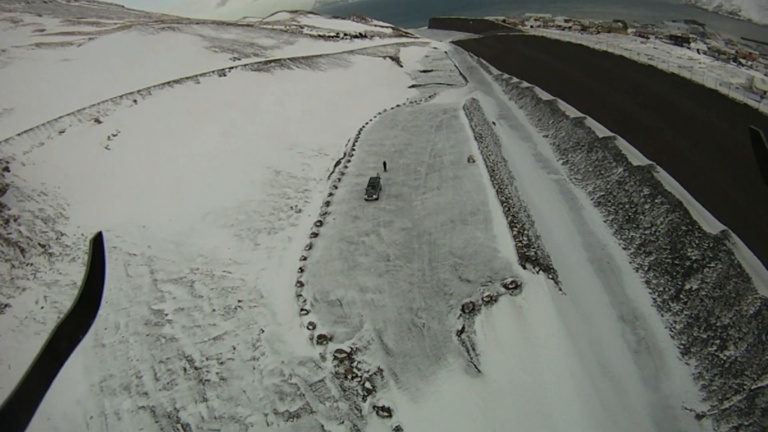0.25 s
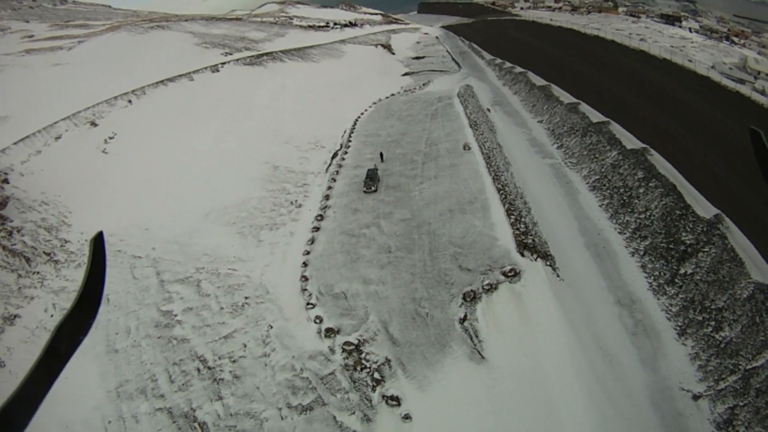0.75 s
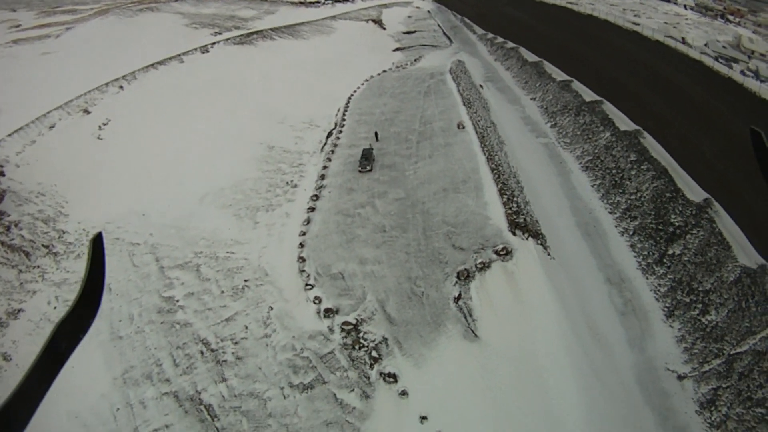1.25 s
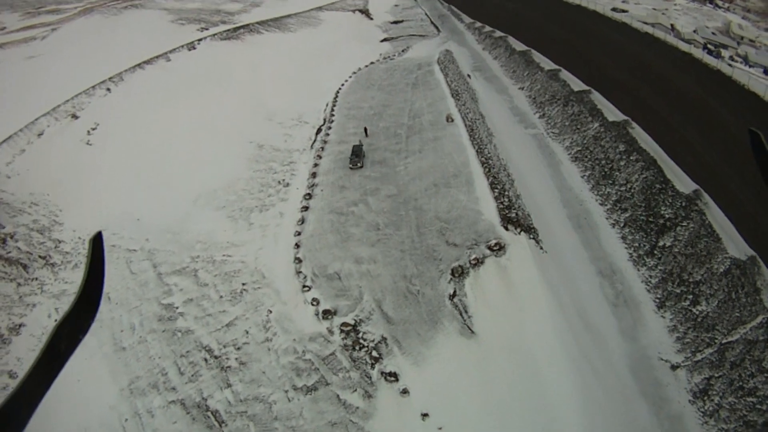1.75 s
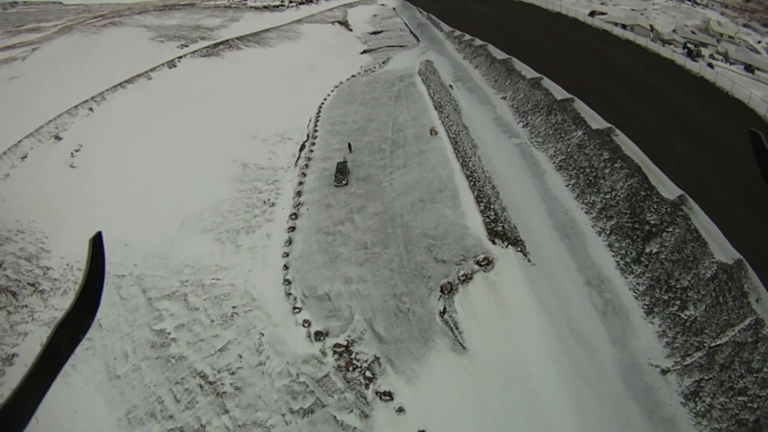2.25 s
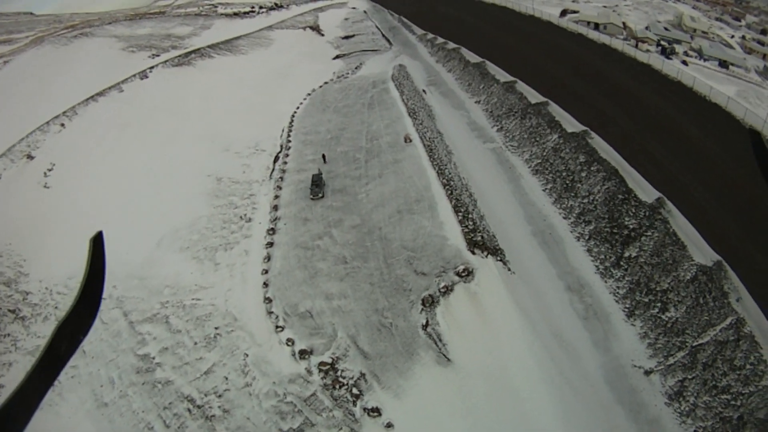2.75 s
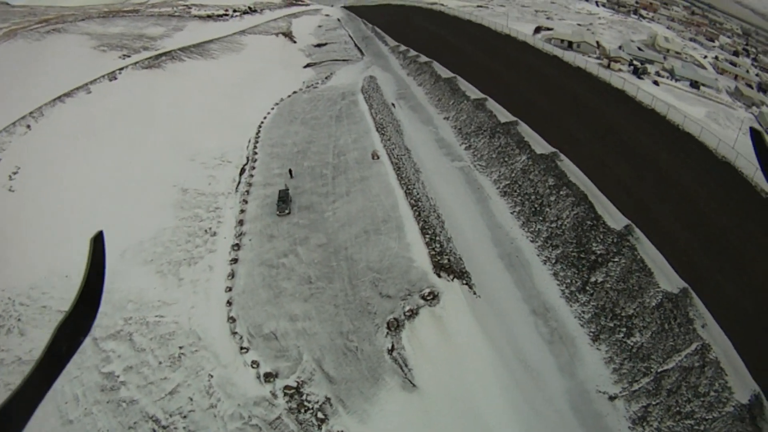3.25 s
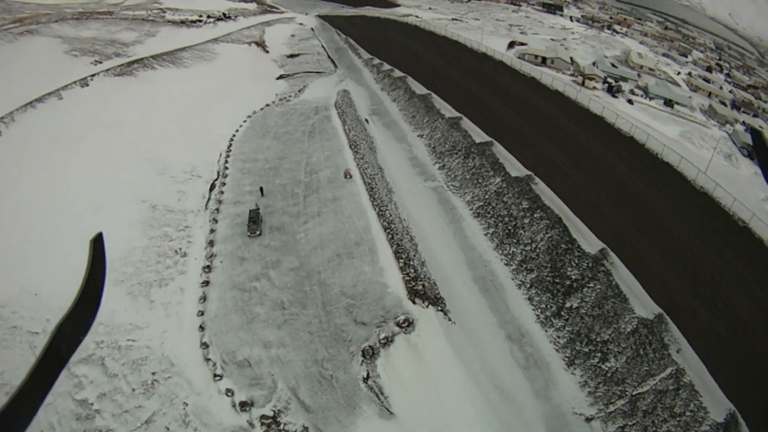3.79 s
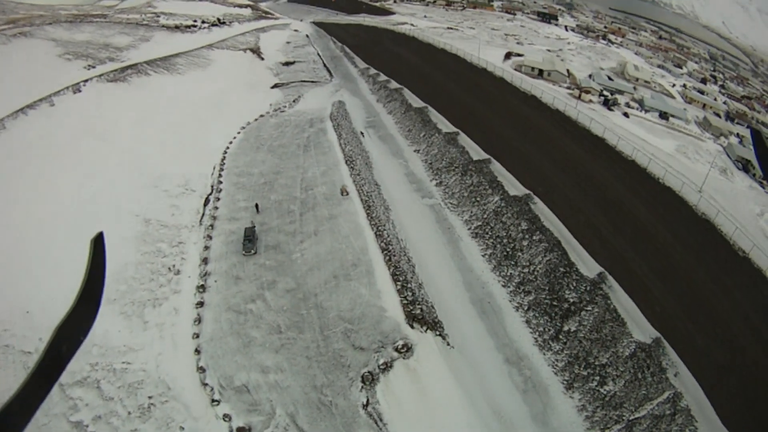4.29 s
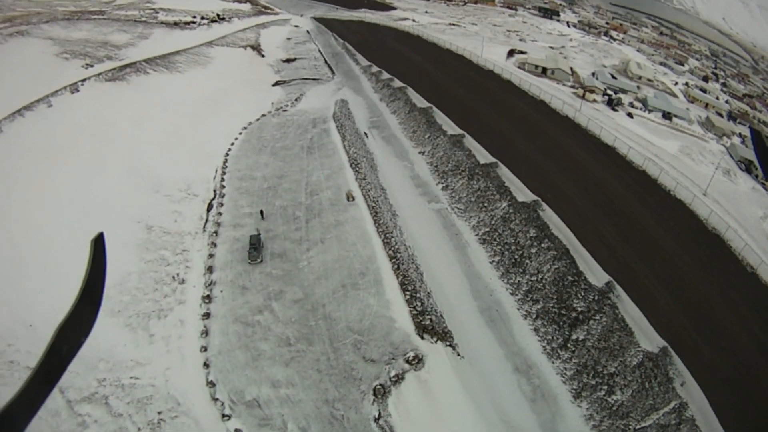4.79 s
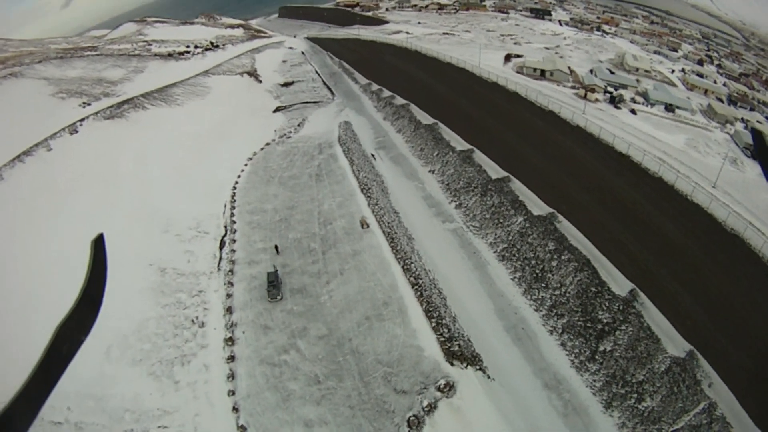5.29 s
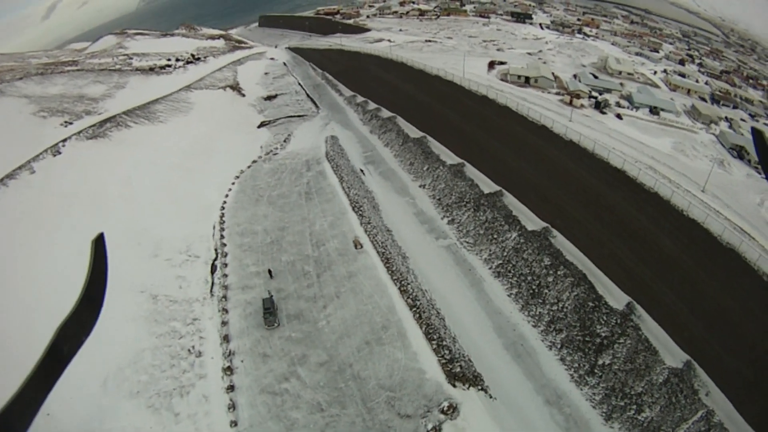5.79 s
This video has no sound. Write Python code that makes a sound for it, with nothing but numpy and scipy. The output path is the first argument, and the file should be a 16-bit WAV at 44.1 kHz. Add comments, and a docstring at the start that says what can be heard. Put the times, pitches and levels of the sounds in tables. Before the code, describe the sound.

Close, rough drone-propeller hum flutters through rapid wind gusts, with low rumble, rasping ticks, hard snaps and faint high motor whine.

```python
"""Eight-rotor drone in gusty wind

Heard from the camera slung under its frame. Propellers at slightly different speeds give a throbbing hum and buzz;
the motor drives whine faintly, blade tips hiss and wind rumbles over the microphone.
Gusts swell the hum, drag its pitch down and bring a rasping crackle of ticks and hard single snaps on the falling
swings of the hum, as of an overloaded microphone. Now and then the propellers cancel: the hum drops into a lull."""
import sys
import numpy as np
from scipy import signal
from scipy.fft import rfft, irfft
from scipy.io import wavfile
from scipy.ndimage import uniform_filter1d, minimum_filter1d

SR = 44100
rng = np.random.default_rng(int(sys.argv[2]) if len(sys.argv) > 2 else 0)


def wav_record(signal):
    """Record a signal, one row per channel, as 16-bit PCM in the file named by sys.argv[1]."""
    frames = np.transpose(np.atleast_2d(signal))
    bounded = np.clip(frames, -1, 1)
    # unit amplitude maps onto the largest positive 16-bit level
    quanta = np.round(bounded * 32767).astype(np.int16)
    wavfile.write(sys.argv[1], SR, quanta)


N = 266099
TIME = np.arange(N) / SR
FREQS = np.maximum(np.arange(N // 2 + 1) * SR / N, 1)


def undb(db):
    """Decibels to gain."""
    return 10 ** (np.asarray(db) / 20)


def level(x, rms_db):
    """Scale to an rms level, treating the mean as zero."""
    return x * undb(rms_db) / np.std(x)


def walk(rate_hz):
    """Smooth random drift with unit spread: random steps averaged twice."""
    hold = int(SR / rate_hz)
    steps = np.repeat(rng.standard_normal(N // hold + 1), hold)
    smooth = uniform_filter1d(uniform_filter1d(steps, hold), hold)
    return level(smooth[:N], 0)


def curve(points):
    """Straight lines over time through (t/s, value) points."""
    return np.interp(TIME, *np.transpose(points))


def colour(x, points):
    """Filter by a spectrum of (f/Hz, gain/dB) points, linear in dB over log f."""
    hz, db = np.transpose(points)
    gain = undb(np.interp(np.log(FREQS), np.log(hz), db))
    return irfft(rfft(x) * gain, N)


# blade-pass rate shared in still air: t/s, f/Hz
BLADE_RATE = [(0.0, 174.3), (0.85, 172.2), (1.04, 166.1), (1.15, 175), (1.35, 164.8), (1.65, 186.2),
              (1.85, 175.8), (2.05, 168.5), (2.3, 174.2), (3.2, 171.1), (3.78, 176.7), (4.05, 167.9),
              (4.4, 172.7), (4.7, 173.2), (5.15, 169.1), (5.31, 186.1), (5.45, 169.1), (5.7, 175.3),
              (6.03, 169.7)]
GUST_SAG_HZ = 9  # per unit gust


def blade_rate(gust, wander_hz=2.5):
    """Pitch of the joint blade tone: gusts drag it down; in calm air it wanders between the propellers."""
    sag_hz = GUST_SAG_HZ * gust
    return curve(BLADE_RATE) - sag_hz + wander_hz * (1 - gust) * walk(18)


# overtones of the joint blade tone, half orders from unbalanced blades: multiple, level/dB
OVERTONES = [(1.5, -15), (2, -15), (2.5, -14), (3, -16.5), (3.5, -26), (4, -29), (5, -29)]


def hum(phase, overtone_db, smear_rad=1.2, flicker_db=1.0):
    """Joint blade tone; overtones of several propellers never hold one phase."""
    overtones = 0
    for multiple, db in OVERTONES:
        overtones = overtones + undb(db) * np.sin(multiple * phase + smear_rad * walk(22))
    flicker = undb(flicker_db * walk(40))
    return np.sqrt(2) * flicker * (np.sin(phase) + undb(overtone_db) * overtones)


# resonances of the frame: f/Hz, width/Hz, lift/dB
FRAME_MODES = [(892, 150, 8), (1439.7, 330, 12), (2371, 380, 15)]


def airframe(x):
    """The frame lifts whatever passes near its resonances."""
    lift_db = 0
    for hz, width_hz, db in FRAME_MODES:
        lift_db = lift_db + db / (1 + (2 * (FREQS - hz) / width_hz) ** 2)
    return irfft(rfft(x) * undb(lift_db), N)


# nominal cruise of each propeller: shaft f/Hz, level/dB
ROTORS = [(76, -4.5), (80, -3.5), (84, -4.5), (88, -3.5), (91, -3), (93.5, -2), (96, -4.5), (99.5, -4)]
# spectrum of the propeller buzz: f/Hz, gain/dB
BUZZ_SPECTRUM = [(70, -1.5), (95, 0.7), (130, -3), (185, 5), (235, -6), (290, -9), (340, -1), (500, -3.5),
                 (600, -16.5), (760, -12.5), (960, -20.5), (1120, -32), (2000, -49), (2500, -53.5),
                 (2800, -68), (6000, -76)]


def propellers(pace, trim=.018, flutter=0.007, follow=.6, shadow_db=3, order=64):
    """Each repeats its own pressure pattern every turn; the controller trims speed, eddies vary strength."""
    turn = np.linspace(0, 1, 2049)
    multiples = np.arange(1, order + 1)[:, None]
    out = 0
    for shaft_hz, db in ROTORS:
        starts = rng.random((order, 1))
        pattern = np.sin(2 * np.pi * (multiples * turn + starts)).sum(axis=0)
        speed_hz = shaft_hz * pace ** follow * (1 + trim * walk(4) + flutter * walk(22))
        position = np.cumsum(speed_hz) / SR % 1
        out = out + undb(db + shadow_db * walk(14)) * np.interp(position, turn, pattern)
    return level(airframe(colour(out, BUZZ_SPECTRUM)), 0)


# gain of the arm resonance: t/s, level/dB
ARM_RING = [(0, 6.5), (.21, -7.5), (.3, 5.5), (.47, 3.5), (.58, -8), (.68, 11.5), (.9, -4), (1.0, 5),
            (1.19, -1.5), (1.52, 6.5), (1.8, 3), (2.1, 2.5), (2.27, -1.5), (2.55, 3.5), (2.64, -2),
            (2.9, 1), (3.35, -5), (3.83, 3), (3.92, -1.5), (4.54, 2.5), (4.63, -8), (4.74, 4), (5.2, -1),
            (5.38, 3.5), (5.47, -2), (5.8, 2.5), (6.03, -1.5)]
ARM_RATE_HZ, ARM_SPREAD_DB, ARM_GUST_DB = 16, 1, -1.5  # last: per unit gust above the mean


def arms(buzz, gust, drift_hz=10):
    """The lowest frame resonance changes level and drifts as propeller overtones pass through it."""
    hz, width_hz, _ = FRAME_MODES[0]
    ring = irfft(rfft(buzz) * np.exp(-((FREQS - hz) / width_hz) ** 2), N)
    turning = np.exp(2j * np.pi * np.cumsum(drift_hz * walk(7)) / SR)
    drifting = np.real(signal.hilbert(ring) * turning)
    ring_db = curve(ARM_RING) + ARM_SPREAD_DB * walk(ARM_RATE_HZ) + ARM_GUST_DB * (gust - gust.mean())
    return buzz - ring + drifting * undb(ring_db)


# wind on the microphone: f/Hz, gain/dB
BUFFET = [(20, -1.5), (45, -8), (68, -0.5), (110, 1), (250, 1), (450, -2.5), (700, -13.5), (1100, -25.5),
          (2000, -46), (5000, -67.5)]


def wind(flicker_db=2):
    """Eddies rumble over the microphone port: coloured noise of unsteady level."""
    rumble = level(colour(rng.standard_normal(N), BUFFET), 0)
    return rumble * undb(flicker_db * np.tanh(walk(35)))


# air hissing off the blade tips: f/Hz, gain/dB
HISS_SPECTRUM = [(500, -10), (2500, -7), (4300, 1.5), (5800, -26.5), (7200, -2), (7550, -8), (8400, -8.5),
                 (9800, -19), (15000, -18.5)]
HISS_DB, PORT_HISS_DB = -68.5, -80.5


def tip_hiss(flutter_db):
    """Blade-tip air noise, shared by both channels and fluttering fast."""
    flutter = undb(flutter_db * walk(180))
    return level(colour(rng.standard_normal(N), HISS_SPECTRUM) * flutter, HISS_DB)


def port_hiss():
    """Weaker steady hiss of the same colour, independent per channel."""
    return level(colour(rng.standard_normal((2, N)), HISS_SPECTRUM), PORT_HISS_DB)


# switching tones of the motor drives: f/Hz, level/dB
WHINE = [(8012, -86), (8032, -88.5), (8045, -78.5), (8066, -81), (8925, -87), (8950, -91)]


def drives(waver_hz=3, flicker_db=2):
    """Thin, almost steady sines from the motor drives."""
    out = 0
    for hz, db in WHINE:
        tone = np.sin(2 * np.pi * np.cumsum(hz + waver_hz * walk(6)) / SR)
        out = out + np.sqrt(2) * undb(db + flicker_db * walk(7.6)) * tone
    return out


# propellers out of step, cancelling: t/s, length/s, depth/dB
LULLS = [(0.129, 0.032, -1.5), (0.273, 0.049, -8.5), (0.559, 0.049, -13), (0.747, 0.036, -9),
         (0.896, 0.049, -8), (1.094, 0.024, -7), (1.204, 0.032, -9.5), (1.485, 0.021, -8),
         (1.608, 0.059, -9), (1.797, 0.053, -11.5), (1.899, 0.024, -7), (2.141, 0.039, -5),
         (2.219, 0.027, -11), (2.297, 0.019, -6), (2.717, 0.028, -12), (3.033, 0.063, -13),
         (3.258, 0.02, -4.5), (3.335, 0.055, -8), (3.568, 0.052, -10), (3.882, 0.026, -9),
         (3.95, 0.033, -6.5), (4.248, 0.022, -11.5), (4.521, 0.024, -9.5), (4.594, 0.021, -9.5),
         (4.946, 0.019, -6.5), (5.018, 0.03, -6), (5.137, 0.022, -13.5), (5.268, 0.04, -2),
         (5.332, 0.029, -8.5), (5.844, 0.034, -7.5), (5.992, 0.019, -12)]


def lulls():
    """Dip in dB over time while the propellers cancel."""
    return sum(db * np.exp(-(2 * (TIME - at) / length) ** 2) for at, length, db in LULLS)


# gusts: t/s, length/s, relative hum level/dB, crackle level re hardest/dB
GUSTS = [(0.182, 0.064, -18, -10), (0.369, 0.035, -22.5, -6.5), (0.447, 0.09, -14, -4.5),
         (0.628, 0.06, -17, -4.5), (0.796, 0.068, -15, -4.5), (1.038, 0.098, -18, -2.5),
         (1.305, 0.125, -16.5, -1.5), (1.405, 0.086, -18, -10), (1.528, 0.079, -24, -4.0),
         (1.656, 0.05, -28, -11), (1.858, 0.049, -20.5, -11.5), (1.933, 0.04, -14, -7),
         (2.068, 0.124, -12.5, -1.0), (2.257, 0.058, -20, -17.5), (2.456, 0.08, -15, -3),
         (2.583, 0.22, -24, -11.5), (2.786, 0.105, -13.5, -1), (2.898, 0.055, -13, -5.5),
         (2.985, 0.035, -14, -4.5), (3.13, 0.1, -16.5, -6.5), (3.212, 0.085, -14.5, -2.5),
         (3.287, 0.037, -17, -8), (3.398, 0.082, -16.5, -3.5), (3.468, 0.035, -16, -5),
         (3.527, 0.047, -12, -5), (3.623, 0.071, -14, -3), (3.731, 0.105, -16.5, -11.5),
         (3.824, 0.061, -11, -1), (3.91, 0.04, -14.5, -5), (4.004, 0.083, -13, -5),
         (4.078, 0.057, -17, -1.5), (4.16, 0.09, -15, -2.5), (4.221, 0.03, -15.5, -14),
         (4.3, 0.03, -20.5, -7.5), (4.351, 0.062, -14, 0), (4.41, 0.04, -16, -9.5),
         (4.478, 0.066, -13.5, -1.5), (4.557, 0.06, -16, -2.5), (4.718, 0.073, -20, -11),
         (4.875, 0.175, -15.5, -3), (4.978, 0.045, -19.5, -6.5), (5.076, 0.099, -24, -11.5),
         (5.212, 0.11, -19.5, -4.0), (5.413, 0.073, -17.5, -4), (5.305, 0.05, -19.5, -11.5),
         (5.505, 0.025, -20, -8.5), (5.574, 0.08, -13.5, -1), (5.681, 0.089, -16.5, -7.5),
         (5.775, 0.105, -14.0, -2), (5.876, 0.051, -9.5, -2), (5.942, 0.052, -15.5, -5.5)]
GUST_SHAPE = 3.0  # 2 is a bell; more gives a flatter top and steeper sides


def swells(peaks_db):
    """Power over time when every gust swells to its own peak and dies away."""
    power = np.zeros(N)
    for (at, length, *_), db in zip(GUSTS, peaks_db):
        near = slice(max(int((at - 2 * length) * SR), 0), int((at + 2 * length) * SR))
        offset = np.abs(2 * (TIME[near] - at) / length)
        power[near] += undb(2 * db) * np.exp(-2 * offset ** GUST_SHAPE)
    return power


# hard single snaps: t/s, low thud level/dB, bright snap level/dB
SNAPS = [(0.356, -19, -35), (0.3661, -31.5, -37.5), (0.4172, -16, -31.5), (0.4885, -23, -35),
         (0.62, -19.5, -34), (0.6317, -20.5, -31), (0.6642, -26.5, -44.5), (0.793, -20.5, -32.5),
         (0.897, -28, -50.5), (0.919, -26.5, -40.5), (1.0133, -22, -29.5), (1.1845, -25, -40),
         (1.24, -18.5, -48), (1.2668, -18, -32), (1.279, -28, -34), (1.3044, -14, -28),
         (1.3172, -17.5, -33), (1.3355, -16.5, -30), (1.4228, -36, -37), (1.514, -20.5, -33),
         (1.572, -20.5, -40), (1.581, -28, -41), (1.6366, -39, -53), (1.6782, -22.5, -36),
         (1.7781, -23.5, -38.5), (1.8429, -18.5, -35), (1.8555, -23.5, -40), (1.8845, -26.5, -40.5),
         (1.9273, -23, -37), (1.9658, -22.5, -40), (2.0709, -20.5, -29), (2.0825, -20.5, -31.5),
         (2.1014, -18.5, -31), (2.1144, -15.5, -35), (2.2516, -33, -38), (2.3181, -22.5, -39),
         (2.3351, -23, -36), (2.4683, -17, -27), (2.5592, -25.5, -37), (2.5995, -21.5, -37),
         (2.6815, -20.5, -41), (2.694, -23.5, -37.5), (2.746, -18.5, -33), (2.7796, -19, -37),
         (2.7977, -19.5, -30.5), (2.8097, -16.5, -33), (2.8492, -26, -42), (2.8838, -38, -41),
         (2.8951, -21, -35.5), (2.9792, -19.5, -33), (3.1625, -20.5, -39), (3.2057, -17.5, -30),
         (3.2167, -18.5, -33), (3.229, -26, -33), (3.2834, -22.5, -35.5), (3.3676, -21, -40),
         (3.386, -19.5, -32), (3.4207, -21, -35), (3.5225, -17.5, -33), (3.5344, -21, -31),
         (3.6013, -22, -35.5), (3.6119, -17.5, -33), (3.7079, -23.5, -33.5), (3.7523, -21, -38),
         (3.8212, -16, -31), (3.912, -20.5, -36), (3.9826, -20, -36), (4.0185, -22, -34.5),
         (4.0736, -18, -30), (4.0848, -21, -33), (4.171, -19.5, -32.5), (4.293, -19, -36.5),
         (4.2999, -15.5, -42), (4.332, -24, -39), (4.3435, -16.5, -29), (4.3553, -15, -29),
         (4.3675, -25.5, -35), (4.4102, -20.5, -35), (4.4947, -24.5, -37), (4.5471, -20.5, -31.5),
         (4.5589, -14, -32), (4.6456, -25.5, -40), (4.7045, -22.5, -39), (4.735, -25.5, -39),
         (4.8691, -14, -37.5), (4.91, -20, -34), (4.9713, -22.5, -33.5), (4.9924, -23.5, -36.5),
         (5.0636, -24.5, -41), (5.185, -19, -34), (5.211, -19, -37), (5.2357, -16, -38),
         (5.247, -18.5, -35), (5.2994, -24.5, -39), (5.3597, -28.5, -43), (5.4023, -21, -31),
         (5.4868, -22.5, -54), (5.5071, -31.5, -34), (5.5556, -14, -32), (5.5676, -21, -29),
         (5.5798, -17, -31), (5.5978, -21.5, -32), (5.6545, -20.5, -47.5), (5.7454, -18, -33),
         (5.7755, -16.5, -34), (5.793, -15, -31), (5.823, -24, -35), (5.885, -16.5, -28),
         (5.899, -20.5, -32), (5.9404, -19.5, -37)]
THUD_GAIN_DB, SNAP_GAIN_DB = 11.5, 53  # from the listed level to the impulse that makes it
TICK_TURN = 0.31  # where in the hum cycle ticks fall: just past the crest


def impulses(levels_db):
    """One impulse at the moment of each hard snap."""
    out = np.zeros(N)
    out[(np.array(SNAPS)[:, 0] * SR).astype(int)] = undb(levels_db)
    return out


def in_step(phase, reach_s=0.02):
    """Bend the hum phase so that hard snaps fall about just after a crest; near snaps share the bend."""
    at = np.array(SNAPS)[:, 0]
    lead = np.exp(1j * (2 * np.pi * TICK_TURN - np.interp(at, TIME, phase)))
    shared = np.exp(-np.abs(at[:, None] - at) / reach_s) @ lead
    return phase + np.interp(TIME, at, np.unwrap(np.angle(shared)))


ALTERNATE_DB = 6  # ticks on successive swings alternate by plus and minus this


def ticks(pressure, phase, gust, scatter_db=8, stray_db=-7, slip_s=0.0005, rest_s=0.012):
    """Tick impulses, one per falling hum swing and some at stray crests; none around a hard snap."""
    size, slip = rng.standard_normal((N // 70 + 1, 2)).T
    swings = np.flatnonzero(np.diff(np.floor(phase / (2 * np.pi) - TICK_TURN)) > 0)
    crests, _ = signal.find_peaks(pressure, height=0, distance=SR // 600)
    strength = np.zeros(N)
    local_rms = np.sqrt(uniform_filter1d(pressure ** 2, size=2000)[crests])
    strength[crests] = undb(stray_db) * pressure[crests] / local_rms
    slips = (SR * slip_s * slip[:len(swings)]).astype(int)
    on_swing = np.clip(swings + slips, 0, N - 1)
    strength[on_swing] = undb(ALTERNATE_DB * (-1.) ** np.arange(len(on_swing)))
    at = np.flatnonzero(strength)
    strength[at] *= undb(scatter_db * np.tanh(0.4 * size[:len(at)]))
    # the gust sets how much energy the ticks of one moment share
    energy = np.abs(uniform_filter1d(strength ** 2, size=2200))
    strength = strength * gust / np.sqrt(energy + 1e-9)
    no_snap = 1. * (impulses(np.array(SNAPS)[:, 1]) == 0)
    return strength * minimum_filter1d(no_snap, int(rest_s * SR))


# brightness of a tick: f/Hz, gain/dB
TICK_SPECTRUM = [(60, -8.5), (250, -1), (1100, 3), (2500, -0.5), (4800, 0), (6500, -2.5), (10000, -2.5),
                 (15000, -9)]


def crackle(strength, ring_hz=480, damping=0.83, lag_samples=0.89, echo_db=-10, echo_s=0.0019,
            grit_db=-8.5, grit_s=0.0024, grit_width=1.3):
    """Each tick is a sharp kink and one damped swing, then a weaker repeat, with gritty noise around."""
    at = np.flatnonzero(strength)
    lag, gap, size = rng.standard_normal((N // 70 + 1, 3))[at // 70].T
    echoes = at + (SR * echo_s * np.exp(.3 * gap)).astype(int)
    echo_strength = strength[at] * undb(echo_db + 2.6 * np.tanh(size))
    # the second channel's ticks shift randomly by about a sample, for slight stereo width
    late = np.round(lag_samples * lag).astype(int)
    kinks = np.zeros((2, N))
    for side, shift in enumerate((0, late)):
        kinks[side, np.clip(at + shift, 0, N - 1)] += strength[at]
        kinks[side, np.clip(echoes - shift, 0, N - 1)] += echo_strength
    # gritty noise surrounds each tick; its treble differs most between the channels
    spread = np.exp(-np.abs(np.arange(-SR // 100, SR // 100) / SR) / grit_s)
    envelope = np.sqrt(np.abs(signal.fftconvolve(strength ** 2, spread / spread.sum(), "same")))
    noise = rng.standard_normal(N) + grit_width * np.diff(rng.standard_normal((2, N + 1)))
    grit = undb(grit_db) * envelope * noise
    ratio = 1j * FREQS / ring_hz
    swing = -rfft(kinks + grit) / (1 + 2 * damping * ratio + ratio ** 2)
    return colour(irfft(swing, N), TICK_SPECTRUM)


def snaps(split_hz=1700, build_s=0.00027, relax_s=0.00071, build_share=0.42):
    """Below split_hz the wave builds up, jumps negative and relaxes with a thud; above, a bright tick."""
    _, thud_db, snap_db = np.transpose(SNAPS)
    t = np.arange(-SR // 100, SR // 100 + 1) / SR
    build = build_share * np.exp(-np.abs(t) / build_s)
    relax = (build_share - 1) * np.exp(-np.abs(t) / relax_s)
    jump = np.where(t < 0, build, relax)
    thud = signal.fftconvolve(impulses(thud_db + THUD_GAIN_DB), jump, "same")
    snap = crackle(impulses(snap_db + SNAP_GAIN_DB), ring_hz=492, damping=0.49, lag_samples=1.0,
                   echo_db=-9.5, grit_db=-12.5, grit_s=0.0017)
    low = 1 / (1 + (FREQS / split_hz) ** 6)
    return irfft(rfft(thud) * low + rfft(snap) * (1 - low), N)


LIMIT, LIMIT_SLOPE, LIMIT_S = 0.43, 0.39, 0.0083  # threshold, share of excess dB removed, window


def limiter(x):
    """Turn the gain down briefly around peaks above the threshold."""
    span = int(LIMIT_S * SR)
    gain = (LIMIT / np.maximum(np.abs(x).max(axis=0), LIMIT)) ** LIMIT_SLOPE
    return x * uniform_filter1d(minimum_filter1d(gain, span), span)


# thrust, which brings out propeller overtones: t/s, level/dB
THRUST = [(0, -1.5), (.7, 0.5), (1.3, 0.5), (1.7, -2.5), (2.1, 2.5), (3.2, 1.5), (4.2, 0.5), (5, 3.5),
          (6, 1)]
# relative hum level between gusts: t/s, level/dB
CALM_HUM = [(0, -23.5), (0.6, -25), (1.2, -22), (1.7, -26.5), (2.2, -21), (2.7, -21), (3.04, -23.5),
            (3.4, -22), (4.3, -20.5), (5.1, -21.5), (6, -21)]
EDDY_RATE_HZ, EDDY_DB = 22, 3.5  # small eddies between gusts
BEAT_RATE_HZ = 24  # propellers drifting in and out of step
CALM_GUST_DB = -15  # gust strength left in calm air, before eddies
CRACKLE_GROWTH = 1.27  # exponent: ticks grow faster than the gust
OVERTONE_GUST_DB = 3.5  # per unit gust: gusts sharpen the blade pulses
HUM_GAIN_DB, BUZZ_DB, RUMBLE_DB, CRACKLE_DB = 0.66, -19, -23.5, -30.5
BUZZ_PER_GUST, BUZZ_PER_THRUST, RUMBLE_PER_GUST = 0.24, 0.92, 0.43  # dB per dB
SHAFT_DB, SHAFT_CALM_DB = -20.5, 1.5  # once-a-turn tones, and their drop per unit gust


def scene(beat_depth=0.3, ceiling=0.61, jitter_rad=0.09, lull_share=0.33, flutter_db=4.0):
    """Sound at the camera; each gust swells the hum, the rumble and the crackle."""
    _, _, hum_db, crackle_db = np.transpose(GUSTS)
    thrust_db = curve(THRUST)
    eddies_db = EDDY_DB * np.tanh(walk(EDDY_RATE_HZ))
    gust = np.sqrt(swells(crackle_db) + undb(2 * (CALM_GUST_DB + eddies_db)))
    gust_db = 20 * np.log10(gust)

    beat = 1 + beat_depth * np.tanh(walk(BEAT_RATE_HZ))
    calm = undb(curve(CALM_HUM) + .5 * eddies_db) * beat
    throb = np.sqrt(swells(hum_db) + calm ** 2) * undb(HUM_GAIN_DB)
    blade_hz = blade_rate(gust)
    phase = in_step(2 * np.pi * np.cumsum(blade_hz) / SR + jitter_rad * walk(45))
    lull_db = lulls()
    overtone_db = thrust_db + OVERTONE_GUST_DB * (gust - gust.mean())
    blades = throb * undb(lull_db) * hum(phase, overtone_db)

    rotors = propellers(blade_hz / blade_hz.mean())
    # thrust and gusts bring out the overtones, but not the once-a-turn tones
    shafts = colour(rotors, [(115, 2.5), (150, -42.0)])
    buzz_db = BUZZ_DB + BUZZ_PER_GUST * gust_db + BUZZ_PER_THRUST * thrust_db + lull_share * lull_db
    buzz = arms(rotors - shafts, gust) * undb(buzz_db)
    buzz = buzz + shafts * undb(SHAFT_DB - SHAFT_CALM_DB * gust)
    rumble = wind() * undb(RUMBLE_DB + RUMBLE_PER_GUST * gust_db)

    pressure = blades + buzz + rumble
    # soft saturation rounds the strongest swings
    rounded = ceiling * np.tanh(pressure / ceiling)
    rasp = level(crackle(ticks(pressure, phase, gust ** CRACKLE_GROWTH)), CRACKLE_DB)
    return rounded + rasp + snaps() + tip_hiss(flutter_db) + port_hiss() + drives()


TOP_HZ = 15600


def record(dry, low_cut_hz=80):
    """The microphone drops the deep bass and the very top; a limiter holds the loudest swells."""
    low_cut = signal.butter(2, low_cut_hz, "high", fs=SR, output="sos")
    sound = limiter(signal.sosfilt(low_cut, dry))
    high_cut = signal.ellip(8, .2, 70, TOP_HZ, fs=SR, output="sos")
    return signal.sosfilt(high_cut, sound)


dry = scene()
out = record(dry)
wav_record(out)
```